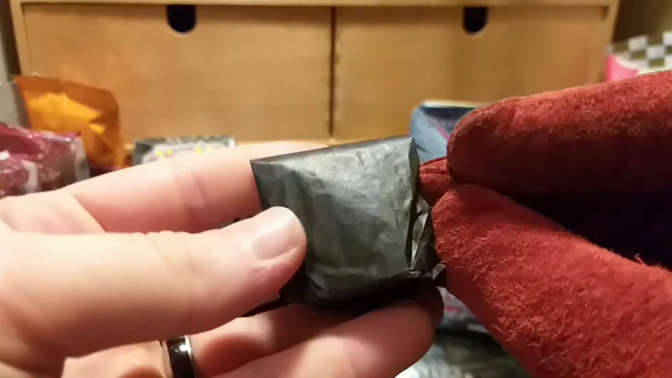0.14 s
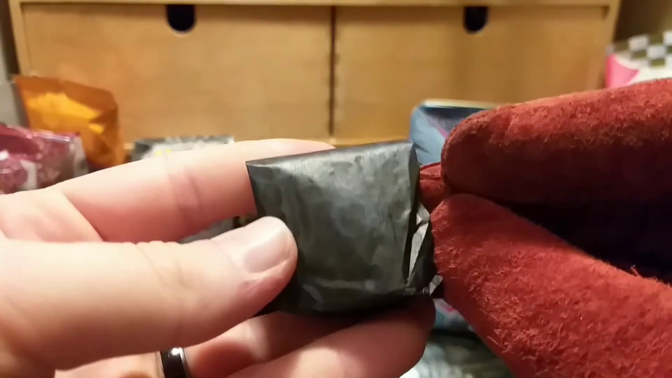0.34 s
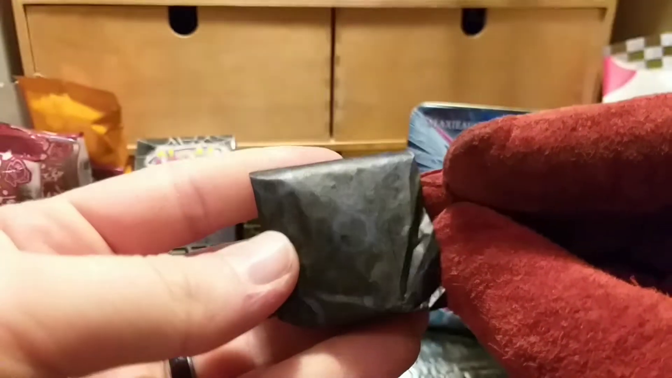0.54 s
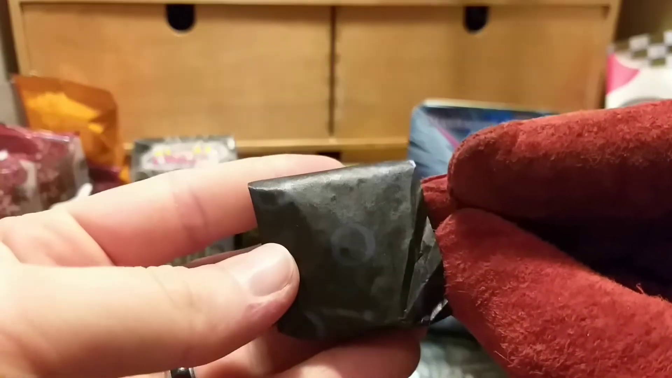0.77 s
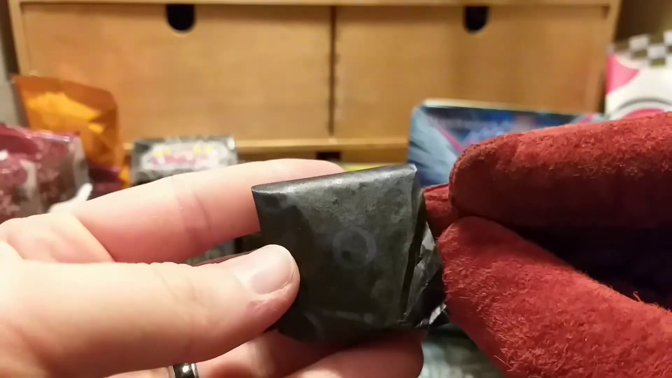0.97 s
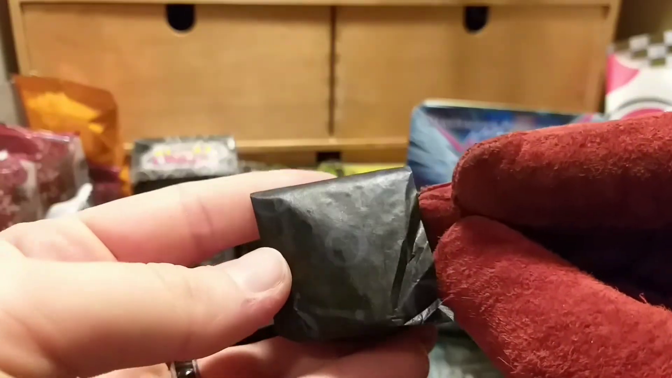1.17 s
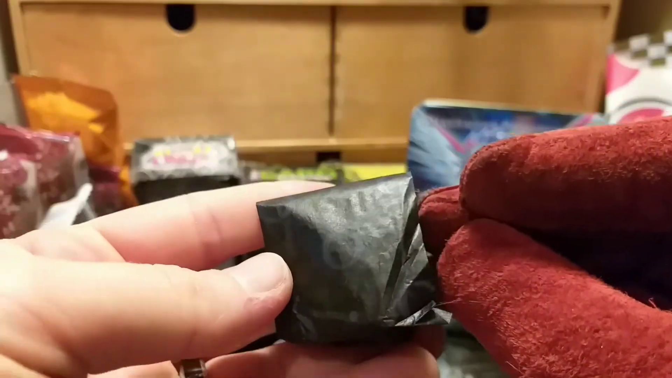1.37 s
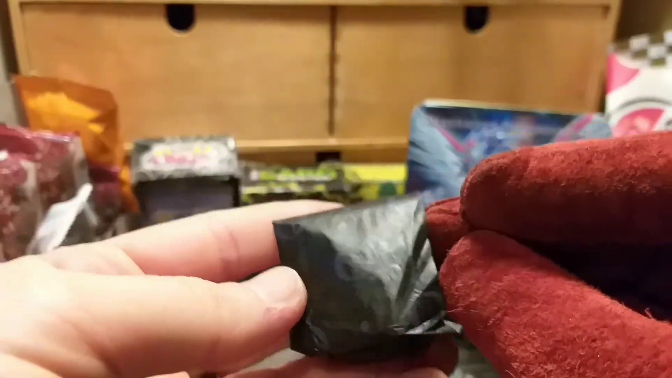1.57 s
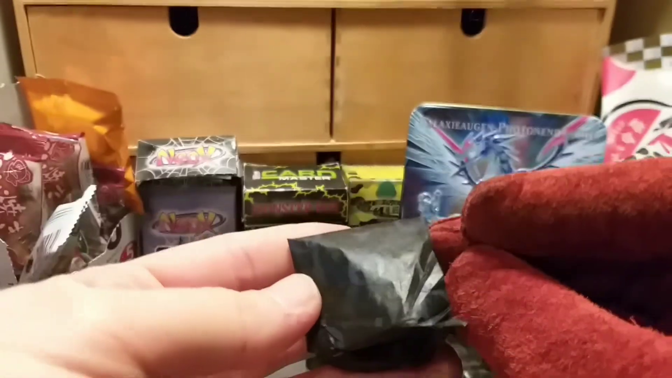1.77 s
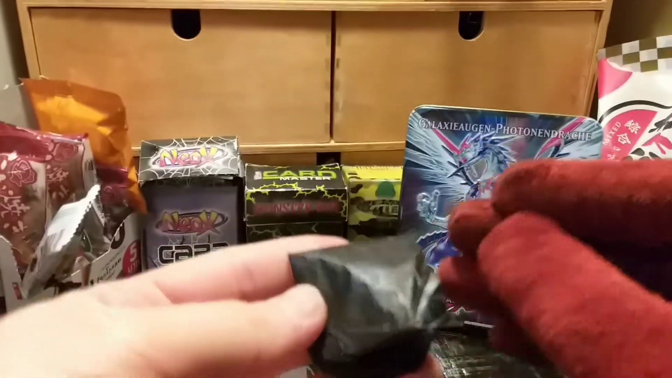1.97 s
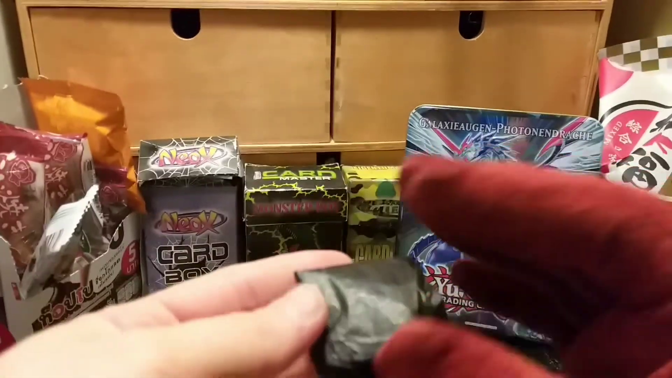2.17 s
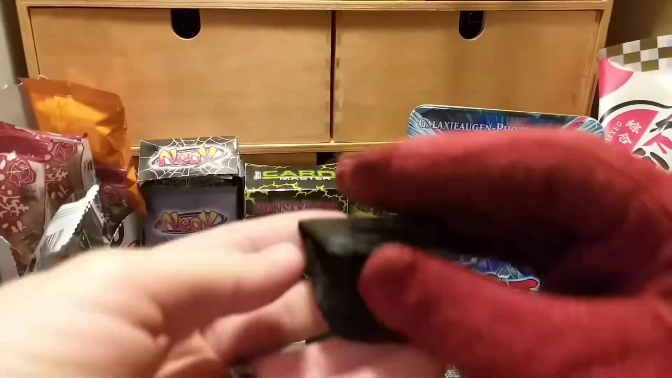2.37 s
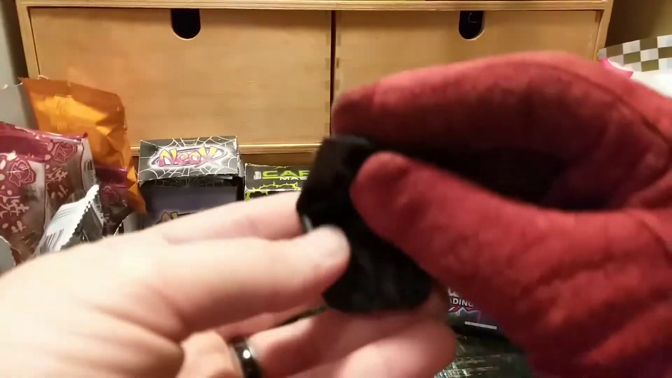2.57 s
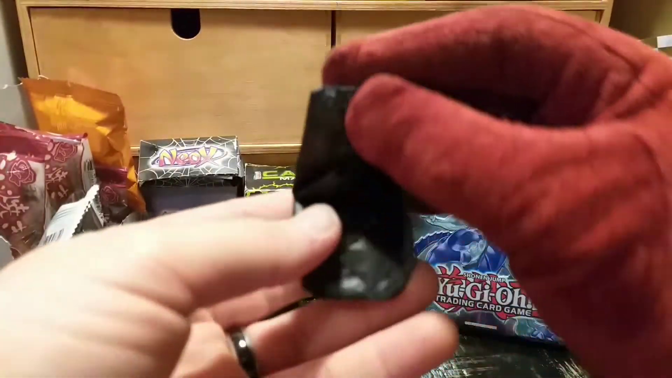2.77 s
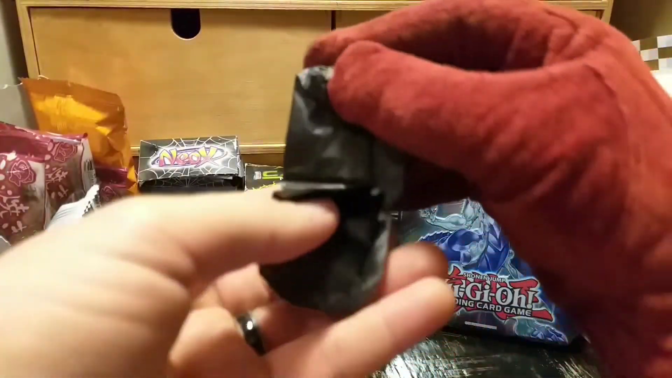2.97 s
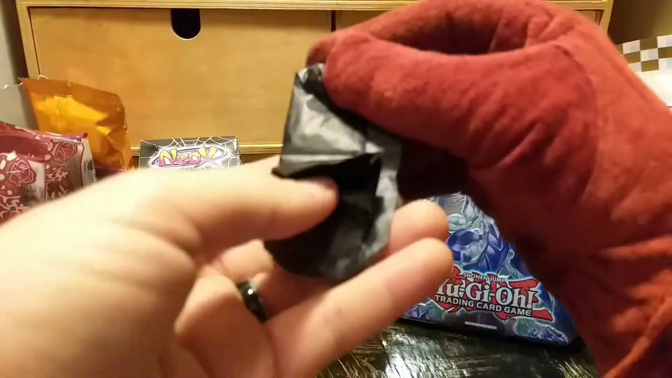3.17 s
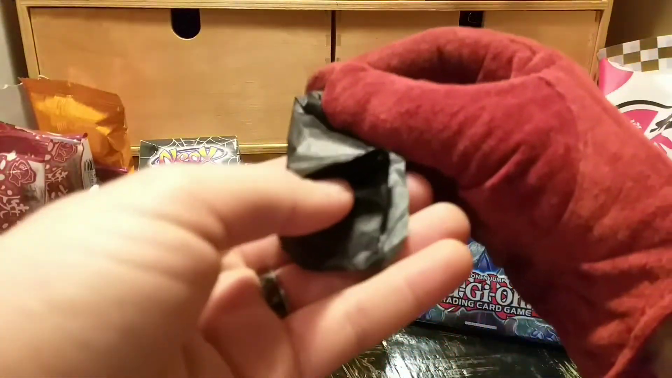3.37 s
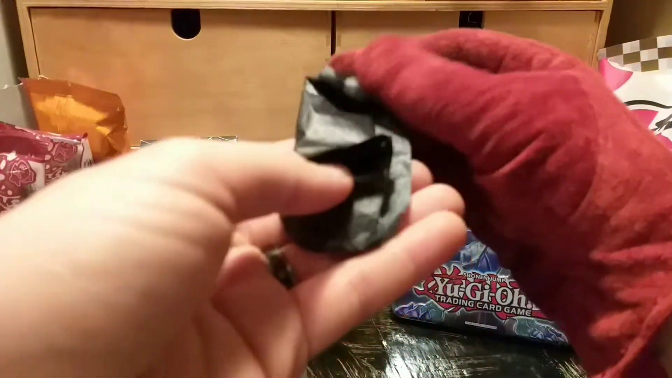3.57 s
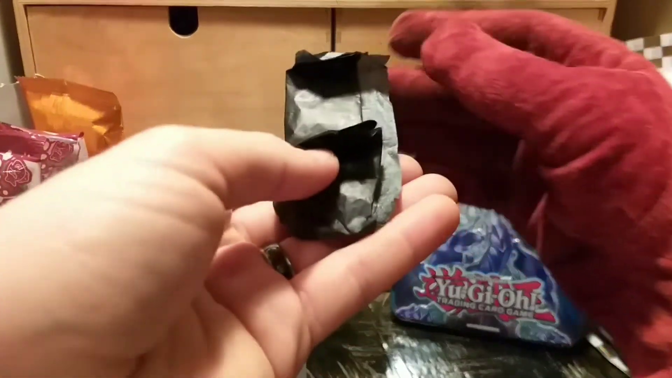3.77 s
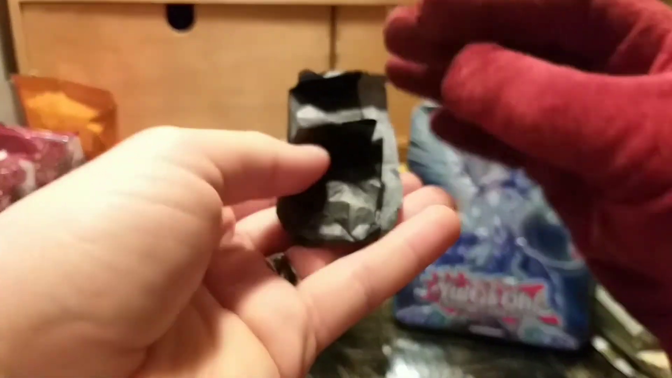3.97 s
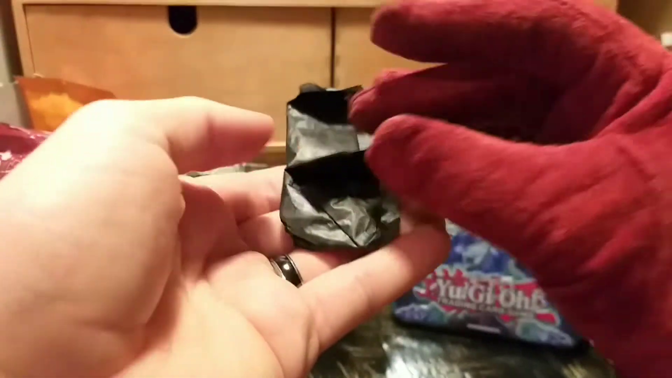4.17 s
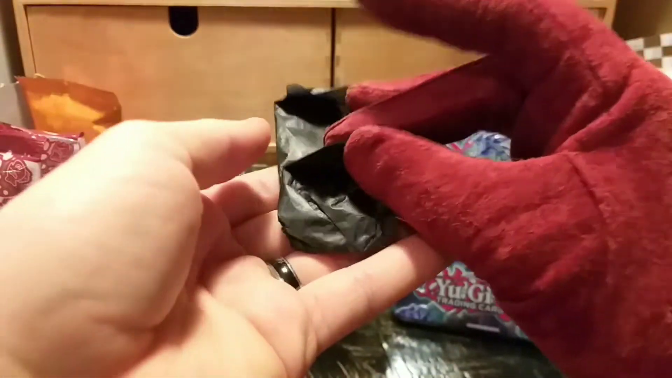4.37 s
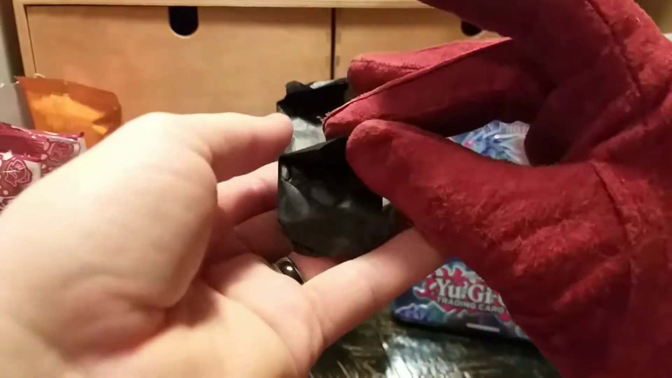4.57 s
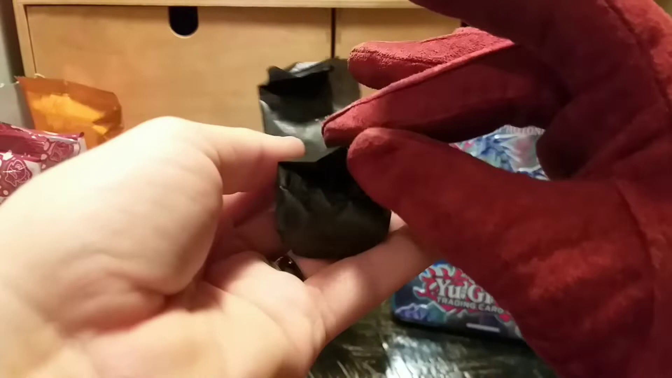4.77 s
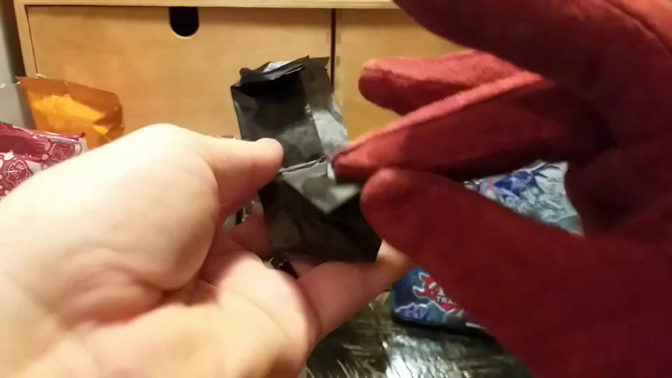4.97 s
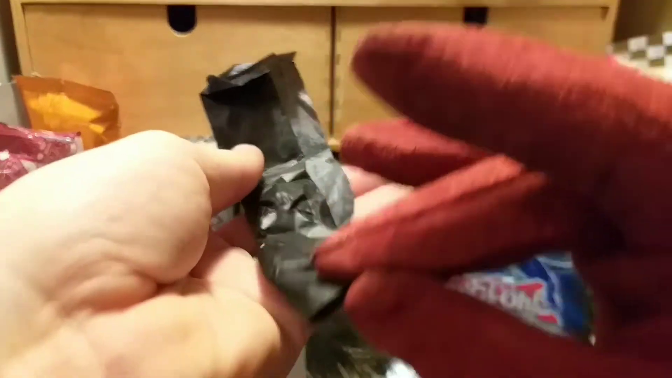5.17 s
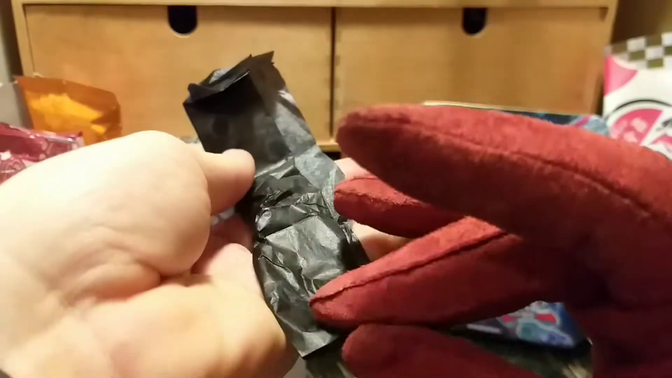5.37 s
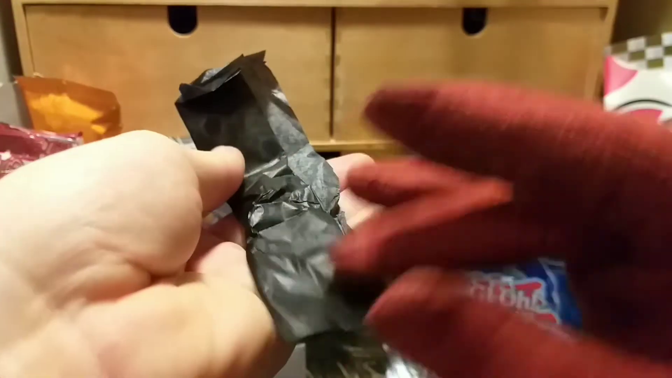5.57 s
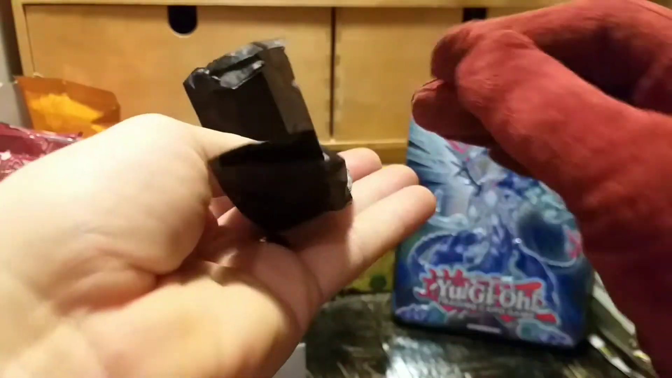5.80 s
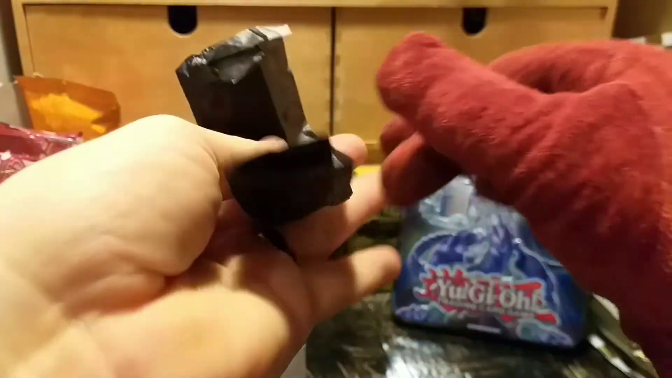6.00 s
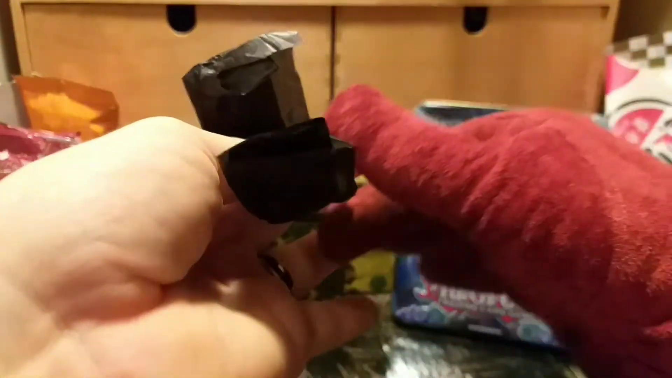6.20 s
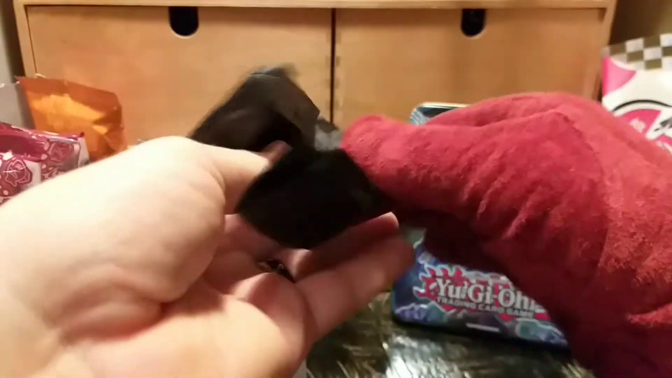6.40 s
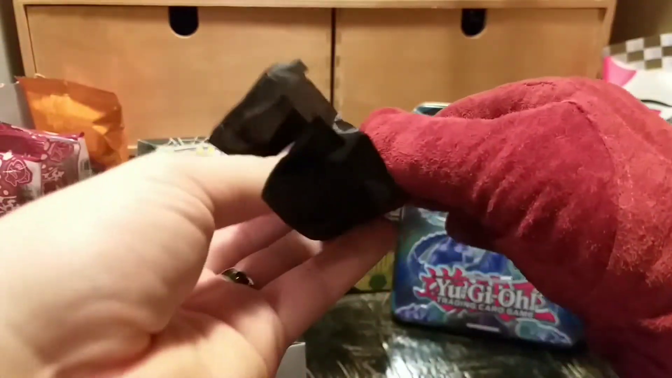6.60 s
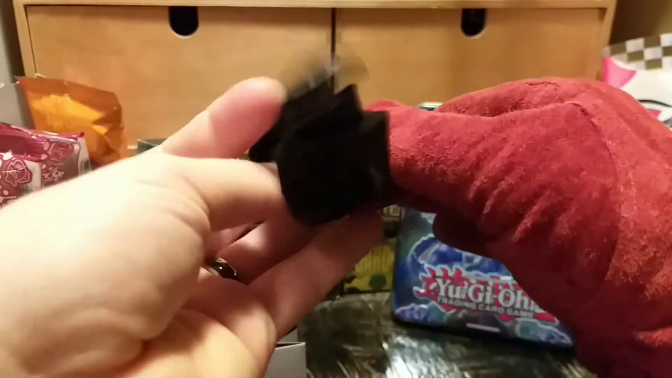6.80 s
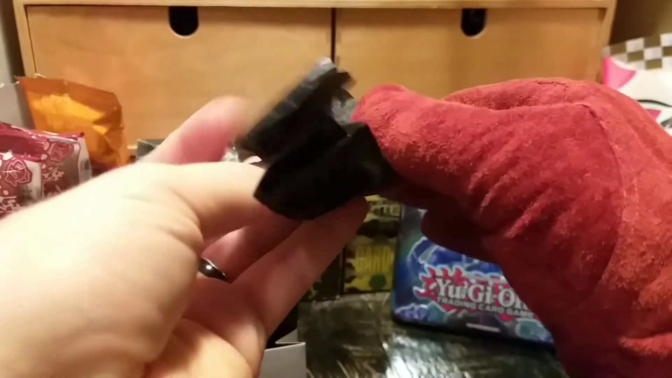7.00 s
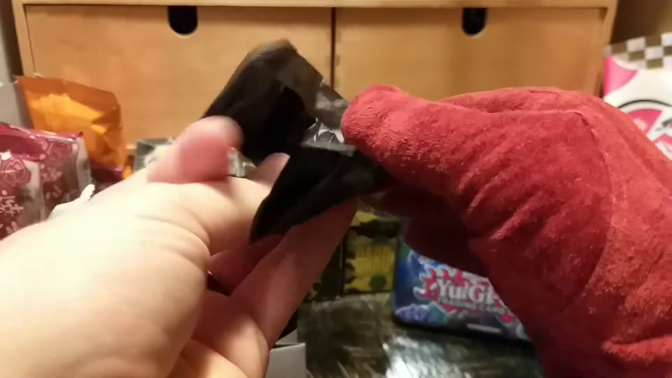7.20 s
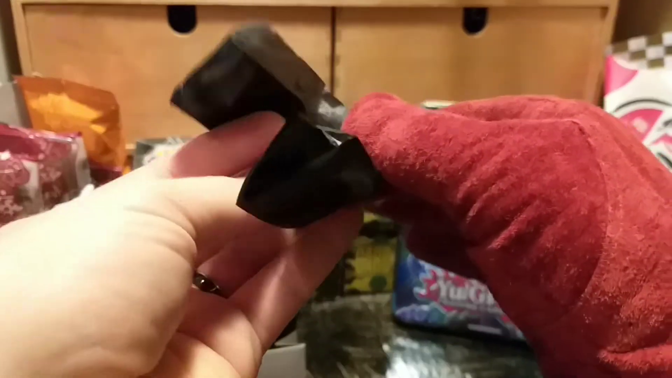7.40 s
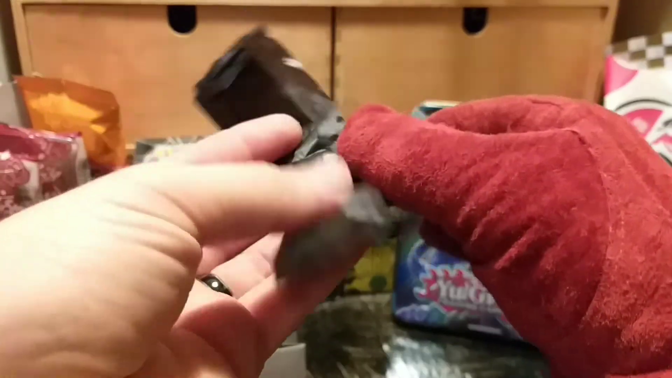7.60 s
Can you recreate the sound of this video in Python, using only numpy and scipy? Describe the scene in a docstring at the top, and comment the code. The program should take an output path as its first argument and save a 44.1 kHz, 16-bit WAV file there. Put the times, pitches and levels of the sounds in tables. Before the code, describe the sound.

Thin, crisp wrapping paper is handled close to a stereo microphone in a quiet small room with a faint low hum. From 0 to 2.2 seconds it is mostly still: tiny ticks, slight rustles, a clear snap near 1.1, and barely audible, soft wooden desk knocks. From about 2.4 the crinkling thickens, with sharp snaps around 2.7 to 2.9 and the fullest, loudest crackling bursts from 3.1 to 3.4. It thins out from 3.6 to 4.2, leaving light ticks. From 4.3 to 5.6 unwrapping is busy again: dense bright crackle, many creases and thin sliding hiss, brightest near 5.2. Around 5.7 to 6.3 only small ticks remain. Brief, strong tugs follow at 6.3, 6.8 and 7.2, the last with a hard snap, separated by quieter gaps, and small crinkles continue to the end after 7.5. Echoes are short and faint.

```python
"""Thin tissue paper, unwrapped by two hands close to a microphone: each tug is a burst of dense crackle
made of short noise grains over a smooth sliding hiss.
Single creases stand out, from faint ticks to loud snaps: resonant noise bursts, with a fading settling hiss.
A wooden desk knocks softly under the arms as a few decaying sines.
The room adds sparse, decaying echoes and a quiet noise floor, strongest at low pitch."""
import sys
import numpy as np
from scipy import signal
from scipy.fft import rfft, irfft, next_fast_len
from scipy.io import wavfile
from scipy.ndimage import uniform_filter1d

SR = 44100
rng = np.random.default_rng(int(sys.argv[2]) if len(sys.argv) > 2 else 0)


def pcm_store(signal):
    """Save signal as 16-bit PCM."""
    levels = np.round(np.clip(np.atleast_2d(signal), -1, 1) * 32767)
    wavfile.write(sys.argv[1], SR, levels.astype(np.int16).T)


N = 337365
FRAME = 2048  # samples per crease and per spectrum
HZ = np.fft.rfftfreq(FRAME, 1 / SR)
DEEP_HZ, BULK_HZ, SHEEN_HZ = 2400, 1300, 9500  # band edges of the paper's colour
CREASE_SIDE_DB = -2.5  # added to the width: creases sit nearer the middle


def gain_of(db):
    """Amplitude factor for a level in dB."""
    return 10 ** (np.asarray(db) / 20)


def evened(x):
    """Scale to unit RMS."""
    return x / np.sqrt(np.mean(x ** 2) + 1e-20)


def read(points, hz):
    """Interpolate a table's second column over log frequency."""
    f, value = np.transpose(points)
    return np.interp(np.log(hz + 1), np.log(f + 1), value)


def causal(db):
    """Minimum-phase spectra for rows of dB gains: nothing rings before the click."""
    log_gain = np.log(gain_of(np.maximum(db, -100)))
    mirrored = np.hstack([log_gain, log_gain[:, -2:0:-1]])
    return np.exp(np.conj(signal.hilbert(mirrored))[:, :len(HZ)])


def below(x, edge_hz):
    """Fourth-order low-pass."""
    return signal.sosfilt(signal.butter(4, edge_hz, fs=SR, output="sos"), x)


def above_sheen():
    """Smooth step in frequency, 0 to 1 around SHEEN_HZ."""
    return 1 / (1 + (SHEEN_HZ / (HZ + 1)) ** 8)


# paper through the microphone: (frequency [Hz], level [dB per Hz])
PAPER_COLOUR = [(290, -69.5), (500, -29.5), (772, -19.5), (1160, -14.5), (1810, -7.5), (2040, -7.5),
                (2460, -2), (3010, -3.5), (3240, -2.5), (4780, 2), (5940, -0.5), (8780, 1.5), (10200, -6),
                (13200, 0), (15900, -11.5)]
# stereo width: (frequency [Hz], side re mid [dB])
SIDE_WIDTH = [(25, -9), (60, -15), (500, -17), (1200, -18), (3000, -20), (5000, -12), (9000, -9),
              (15000, -9)]


def creases(pitch_hz, depth_db, sheen_db, t60_s, side_db):
    """A crease breaks as a burst of tiny cracks; its flat facet rings. Rows x (mid, side) x time."""
    t = np.arange(FRAME) / SR
    noise = rng.standard_normal((len(t60_s), 2, FRAME))
    cracks = noise * abs(noise) ** 0.78  # spiky: a few cracks carry the burst
    t60_s = np.clip(t60_s, .002, .05)[:, None]
    rise = (1 - np.exp(-t / (0.077 * t60_s))) ** 2  # long creases also start slowly
    burst = cracks * (rise * gain_of(-60 * t / t60_s))[:, None]

    half_width_hz = .12 * pitch_hz[:, None]
    facet_db = 8.74 / (1 + ((HZ - pitch_hz[:, None]) / half_width_hz) ** 2)
    deep = 1 / (1 + (HZ / DEEP_HZ) ** 6)
    deep_tilt = 1 + 0.13 * np.log2(DEEP_HZ / np.clip(HZ, 600, DEEP_HZ))
    colour_db = read(PAPER_COLOUR, HZ) + facet_db
    colour_db = colour_db + deep * deep_tilt * depth_db[:, None] + above_sheen() * sheen_db[:, None]
    spread = np.array([np.ones_like(HZ), gain_of(side_db + read(SIDE_WIDTH, HZ))])
    return irfft(rfft(burst) * causal(colour_db)[:, None] * spread)


# tugs of the fingers: (start [s], length [s], crackle level [dB], depth = lift below 2.4 kHz [dB],
# bulk = further lift below 1.3 kHz [dB])
FINGER_TUGS = [(0.0, 0.16, -74, 11, -3), (.33, 0.039, -67.5, 5, -3), (0.427, 0.1, -62.5, 6.5, 1),
               (0.593, 0.017, -65, 9.5, -11), (0.942, 0.047, -75.5, -7, 3), (1.316, .11, -59.5, 3.5, 10),
               (1.596, 0.16, -62, 8.5, -7), (1.777, 0.18, -64, 10.5, -2), (1.91, 0.13, -60.5, 5, 0),
               (2.158, .17, -58, 4, 2), (2.381, 0.16, -48, 3.5, 8), (2.57, 0.12, -62.5, 4, -4),
               (2.681, 0.077, -46.5, 2.5, -2), (2.792, 0.13, -44.5, -10, -7), (2.973, 0.051, -48, -1, 11),
               (3.074, 0.058, -37, 0.5, 10.5), (3.169, 0.11, -48, 11.5, 5), (3.333, 0.065, -36.5, 1, -2),
               (3.403, 0.058, -42.5, 11, 6.5), (3.499, 0.16, -46, 6.5, 3), (3.78, 0.054, -60.5, 3, 0),
               (3.958, 0.078, -60.5, 6.5, 0), (4.056, 0.013, -50, 3, 10), (4.264, .18, -44.5, 1.5, 0.5),
               (4.586, 0.14, -59, 4, 10), (4.709, .07, -44.5, -1, 2), (4.806, 0.4, -46.5, -2.5, 2),
               (5.168, 0.16, -39.5, -13, -15), (5.325, 0.17, -51.5, 0.5, -22), (5.538, 0.085, -44.5, 2, -2),
               (5.787, 0.036, -57, 1, -2), (5.92, 0.11, -60.5, 2, 1), (6.001, 0.034, -55, 6, 2),
               (6.068, 0.07, -67, 2, -5), (6.323, 0.064, -41, 1.5, 2.5), (6.474, 0.074, -54, 8, 3),
               (6.682, 0.061, -58.5, 7.5, -4), (6.787, 0.049, -37, 3, 4.5), (6.942, 0.13, -54.5, 6, 2),
               (7.169, 0.071, -42, 0.5, 2), (7.3, 0.13, -53.5, 2, 8.5), (7.44, 0.077, -67, 5, 0),
               (7.515, 0.036, -47, 6.5, -1), (7.59, .06, -42.5, 1, -1)]
STILL_DB = -96  # hands at rest
RISE_DB_PER_S, FALL_DB_PER_S = 587, 400
SWELL_DB = 3  # tug ends re its middle, as a drop


def handling():
    """Tugs set in, swell and fall; overlapping powers add and weight the colour towards the louder."""
    t = np.arange(0, N / SR + .002, .001)
    start_s, length_s, level_db, depth_db, bulk_db = np.transpose(FINGER_TUGS)[..., None]
    early_s = np.maximum(start_s - t, 0)
    late_s = np.maximum(t - start_s - length_s, 0)
    swell_db = SWELL_DB * (np.sin(np.pi * np.clip((t - start_s) / length_s, 0, 1)) - 1)
    power = gain_of(level_db + swell_db - RISE_DB_PER_S * early_s - FALL_DB_PER_S * late_s) ** 2
    total = power.sum(0) + gain_of(STILL_DB) ** 2
    curves = 10 * np.log10(total), (power * depth_db).sum(0) / total, (power * bulk_db).sum(0) / total
    return (np.interp(np.arange(N) / SR, t, curve) for curve in curves)


def slide():
    """Fingers glide over the sheet: smooth noise in the paper's colour, with duller treble."""
    colour_db = read(PAPER_COLOUR, HZ) - 7 * above_sheen()
    spectra = causal(np.array([colour_db, colour_db + read(SIDE_WIDTH, HZ)]))
    taps = irfft(spectra)[:, :512]
    hiss = signal.oaconvolve(rng.standard_normal((2, N)), taps, axes=1)[:, :N]
    return hiss / hiss[0].std()


def crackle(max_per_s=600., spread_db=3.5, clump_db=2.5, count=20):
    """Many small creases break in clumps over the sliding hiss; the bend of the sheet colours both."""
    level_db, depth_db, bulk_db = handling()
    busy = np.clip(gain_of(.4 * (level_db + 42.5)), .25, 1)  # light handling breaks fewer creases

    draw = rng.random((count, 4))
    pitch_hz = 2600 * 3.46 ** draw[:, 0]
    kind_depth_db, sheen_db = 14 * draw[:, 1] - 8.5, 9 * draw[:, 2] - 3
    t60_s = 0.0056 + 0.016 * draw[:, 3]
    kinds = creases(pitch_hz, kind_depth_db, sheen_db, t60_s, CREASE_SIDE_DB)
    kinds /= np.linalg.norm(kinds[:, 0], axis=1)[:, None, None]

    smooth = uniform_filter1d(rng.standard_normal(N), size=300)
    clumps = evened(uniform_filter1d(smooth, size=300))
    size_db = spread_db * np.minimum(rng.exponential(1, N), 3.2) + clump_db * clumps
    breaks = rng.random(N) < busy * max_per_s / SR
    size = gain_of(size_db) * breaks
    size *= gain_of(level_db) / np.sqrt(busy * np.mean(size ** 2 / busy))  # fewer creases, same power

    kind = rng.integers(0, count, N)
    grains = sum(signal.oaconvolve((size * (kind == k))[None], kinds[k, :, :900], axes=1)[:, :N]
                 for k in range(count))
    grains += slide() * gain_of(level_db - 6.0 - 4.2 * busy)  # slide shows most in light handling

    # a loose bend is deeper than a tight pinch; crushing the whole parcel adds bulk
    low = below(grains, DEEP_HZ)
    body = low + below(low, BULK_HZ) * (gain_of(bulk_db) - 1)
    return grains - low + body * gain_of(depth_db)


# air between hands, parcel and desk: (frequency [Hz], width [Hz], lift [dB])
AIR_POCKET = [(830, 170, 2.5), (1165, 190, -3), (1487, 50, 6), (1840, 92, 2), (2040, 59, -2),
              (2330, 270, 4.5), (3030, 110, -4.5), (3164, 55, 4)]


def pocket(x):
    """Cupped hands and desk top lend peaks and dips to every crease."""
    db = sum(lift_db / (1 + (2 * (HZ - hz) / width_hz) ** 2) for hz, width_hz, lift_db in AIR_POCKET)
    return signal.oaconvolve(x, irfft(causal(db[None])), axes=1)[:, :N]


# reverberation: (frequency [Hz], t60 [s])
ROOM_DECAY = [(1000, 0.19), (4000, 0.11), (12000, 0.12)]


def room(x, start_s=0.0039, wall_s=0.0056, near_db=-2.0, count=3, turn_hz=7):
    """Sparse echoes, weaker before the first wall, decay per band; path sets take turns at turn_hz."""
    taps = np.zeros((count, 2, SR // 4))
    at = np.arange(round(start_s * SR), SR // 4 - 20, 20)
    at = at + rng.integers(0, 20, (count, 2, len(at)))
    np.put_along_axis(taps, at, rng.choice([-1., 1.], at.shape), 2)
    taps[..., :round(wall_s * SR)] *= gain_of(near_db)

    hz, t, z = signal.stft(taps, SR, nperseg=128)
    decay = gain_of(-60 * t / read(ROOM_DECAY, hz)[:, None])
    tails = signal.istft(z * decay, SR, nperseg=128)[1]
    tails *= gain_of([[0], [-8.]]) / np.linalg.norm(tails[0, 0])  # mid, side

    phase = np.arange(N) / SR * 2 * np.pi * turn_hz + np.arange(count)[:, None] * np.pi / count
    shares = np.cos(phase) * np.sqrt(2 / count)
    return signal.oaconvolve((x * shares)[:, None], tails, axes=2).sum(0)[:, :N]


# room tone: (frequency [Hz], level [dB per Hz])
TONE_COLOUR = [(24, -24), (40, -10), (140, -4), (275, -15), (312, -11.5), (401, -12.5), (515, -17),
               (713, -20.5), (893, -19.5), (1270, -21.5), (1440, -24), (2040, -22.5), (14700, -26),
               (15900, -43)]
TONE_DB = -75  # RMS of mid


def room_tone():
    """Low hum of the house over microphone hiss: steady noise shaped in frequency."""
    frames = N // 512 + 5
    real, imag = rng.standard_normal((frames, len(HZ), 2, 2)).T
    z = (real + 1j * imag) * gain_of(read(TONE_COLOUR, HZ))[:, None]
    z[1] *= gain_of(read(SIDE_WIDTH, HZ) - 1.5)[:, None]
    tone = signal.istft(z, nperseg=FRAME, noverlap=1536)[1][:, :N]
    return gain_of(TONE_DB) * tone / tone[0].std()


# creases that stand out singly, from faint ticks to loud snaps, before the pocket:
# (time [s], peak level [dB], facet pitch [Hz], depth = lift below 2.4 kHz [dB])
SINGLE_SNAPS = [(0.2567, -25, 4100, -9), (0.27, -38, 4950, -1), (0.3637, -49, 8180, -6),
                (0.43, -36.5, 5140, -9), (0.4819, -46, 7060, -18), (0.5717, -35.5, 7500, -27),
                (0.594, -33, 5200, -40), (0.604, -25, 8040, -43), (0.644, -47.5, 5500, -18),
                (1.068, -38, 9100, -19), (1.0829, -18, 4660, -28), (1.415, -39, 6600, -21),
                (1.58, -46, 4070, 1), (1.6722, -40.5, 7500, 3), (1.7238, -37, 4390, -10),
                (1.823, -32, 7540, -34), (1.8352, -38.5, 4940, -10), (1.9378, -32.5, 6460, -36),
                (2.0098, -27.5, 4970, -54), (2.027, -29, 4130, -43), (2.102, -40.5, 7110, -19),
                (2.1234, -25.5, 4940, -55), (2.2268, -29, 4740, -22), (2.25, -26.7, 9150, -14),
                (2.3774, -31, 8400, -1), (2.4128, -35.5, 7200, -6), (2.472, -29.5, 8150, 0),
                (2.507, -23, 9050, -3), (2.5159, -23, 4800, -4), (2.541, -23.5, 7850, -1),
                (2.5942, -40, 4000, -13), (2.677, -26.5, 6750, -35), (2.6992, -19.5, 7500, -33),
                (2.728, -24.5, 7140, -2), (2.7708, -28, 4370, 1), (2.8255, -25, 8950, 1),
                (2.8468, -21.5, 3200, -3), (2.8813, -17.5, 3400, 1), (2.8917, -17, 6900, -3.5),
                (2.924, -27.5, 5400, -7), (2.969, -23.5, 4500, -0.5), (3.11, -17, 4620, 6.5),
                (3.139, -20.5, 8300, -1), (3.2585, -30, 5170, 9), (3.3109, -26.5, 7600, 4),
                (3.4368, -34, 4260, 16), (3.4498, -25.5, 5900, 12), (3.52, -26, 5500, -31),
                (3.572, -29, 5740, -6), (3.645, -23.5, 10200, -41), (3.7207, -37, 8360, 2),
                (3.762, -38.5, 7400, -16), (3.789, -36, 6330, -28), (3.8163, -30.5, 8450, -6),
                (3.8233, -35.5, 5630, -30), (3.9358, -40.5, 8310, -1), (4.006, -38, 6760, -26),
                (4.1258, -32.5, 9500, -6), (4.2304, -38.5, 8500, -5), (4.326, -24, 7000, 2),
                (4.401, -33, 4910, 9.5), (4.415, -19.5, 9800, 2), (4.427, -25, 4930, -2),
                (4.4687, -28.5, 5060, -8), (4.514, -30.5, 8550, -19), (4.6258, -36.5, 5300, -3),
                (4.6942, -29.5, 5100, -20), (4.7227, -25.5, 4800, -5), (4.7557, -23, 3600, -1.5),
                (4.7789, -21.5, 5450, -0.5), (4.846, -18.5, 7160, -3.5), (4.8949, -23, 6400, -3),
                (4.9183, -20.5, 8400, -9), (4.9494, -21.5, 9100, -10), (4.9562, -18, 4850, -15),
                (4.9655, -27, 4650, -5), (5.0109, -22, 7300, -0.5), (5.0482, -20.5, 7900, -17),
                (5.1289, -20, 8000, -4), (5.201, -31, 5100, 10), (5.279, -27.5, 7410, 9),
                (5.307, -24, 4470, 0.5), (5.3904, -29.5, 4350, -13), (5.404, -24, 4600, -17),
                (5.4177, -25, 4180, -10), (5.431, -28.5, 4680, -15), (5.484, -31, 4430, 1),
                (5.5248, -24.5, 5960, -2), (5.5466, -24, 9100, -16), (5.6147, -25.5, 4280, -19),
                (5.639, -28, 5750, -7), (5.6609, -32.5, 6900, 2), (5.685, -40.5, 6160, -18),
                (5.699, -46, 4480, -16), (5.7698, -28, 3800, 2.5), (5.795, -41, 4470, -5),
                (5.8174, -46, 4950, -22), (5.8475, -40.5, 8900, -11), (5.8761, -25, 4830, -5),
                (5.9424, -37.5, 8250, -2), (5.9598, -38.5, 5500, -11), (6.0001, -31, 6200, -26),
                (6.012, -27, 6200, -22), (6.098, -40, 7050, -18), (6.121, -46, 4160, -24),
                (6.4039, -29, 4630, 1), (6.5142, -34.5, 8100, -6), (6.6308, -45.5, 9000, 12),
                (6.798, -29, 6940, -3), (6.8278, -19, 3940, 0.5), (6.8916, -31.5, 5640, 4),
                (7.0631, -30.5, 7500, -20), (7.0989, -34, 4900, 8.5), (7.126, -28.5, 7800, -31),
                (7.147, -36, 8570, -29), (7.161, -29.5, 5900, -3), (7.174, -16.5, 9000, -4),
                (7.1894, -23.5, 5800, 6.5), (7.2256, -30.5, 4020, 23.5), (7.2519, -29.5, 4400, 7.5),
                (7.3366, -28.5, 8800, 1.5), (7.3987, -32.5, 5900, -20), (7.5193, -29, 6200, 2.5),
                (7.5486, -35, 8500, -14), (7.592, -25, 5060, -17)]
SNAP_T60_S, SNAP_HZ, SMALL_IS_SHORT = .012, 5500, 0.33  # t60 at SNAP_HZ; exponent: high facets stop sooner
SETTLE_DB, SETTLE_DB_PER_S = -38.5, 238  # hiss start re snap peak, fade
SETTLE_DEPTH = 0.13  # share of the snap's depth


def snaps():
    """Single creases, from faint ticks to loud snaps; the sheet settles after each with a fading hiss."""
    time_s, peak_db, pitch_hz, depth_db = np.transpose(SINGLE_SNAPS)
    sheen_db = -2.5 + 5.1 * rng.standard_normal(len(time_s))
    t60_s = SNAP_T60_S * (SNAP_HZ / pitch_hz) ** SMALL_IS_SHORT
    sounds = creases(pitch_hz, depth_db, sheen_db, t60_s, CREASE_SIDE_DB)
    sounds *= (gain_of(peak_db) / abs(sounds[:, 0]).max(1))[:, None, None]
    out = np.zeros((2, N + FRAME))
    at = np.round(time_s * SR).astype(int)
    for start, sound in zip(at, sounds):
        out[:, start:start + FRAME] += sound

    power = [np.bincount(at, gain_of(peak_db + SETTLE_DB + lift_db) ** 2, N)
             for lift_db in (0, SETTLE_DEPTH * depth_db)]
    fade = gain_of(-SETTLE_DB_PER_S / SR) ** 2
    top, bottom = np.sqrt(signal.lfilter([1], [1, -fade], power))
    hiss = slide()
    low = below(hiss, DEEP_HZ)
    return out[:, :N] + (hiss - low) * top + low * bottom


# blows of the arms: (time [s], drive level [dB], lift of lowest mode [dB])
ARM_KNOCKS = [(0.412, -92, -2), (0.46, -79.5, -13), (0.967, -84.5, -2), (1.018, -93, -18),
              (1.32, -69.5, -14), (1.672, -73, -8.5), (1.764, -91, 3), (1.832, -78.5, -12),
              (3.11, -68, -29), (7.191, -70, -17)]
# modes of the wood: (frequency [Hz], level re drive [dB], t60 [s])
DESK_MODES = [(118.1, 14.5, 0.55), (307, 2.5, 0.19), (404.6, 8, 0.22), (456, 5.5, 0.19)]


def desk():
    """Soft blows of the arms ring the low modes of the wood as decaying sines."""
    t = np.arange(SR // 2) / SR
    out = np.zeros(N + SR)
    for time_s, drive_db, low_db in ARM_KNOCKS:
        lifts_db = [low_db] + [0] * (len(DESK_MODES) - 1)
        ring = sum(gain_of(db + lift_db - 60 * t / t60_s) * np.sin(2 * np.pi * (hz * t + rng.random()))
                   for (hz, db, t60_s), lift_db in zip(DESK_MODES, lifts_db))
        soft_onset = 1 - np.exp(-t / 0.005)
        out[round(time_s * SR):][:len(t)] += gain_of(drive_db) * ring * soft_onset
    return np.array([out[:N], 0.042 * out[:N]])  # mid, side


def scene():
    """Sum mid and side of all sources, then turn them into left and right."""
    paper = pocket(snaps() + crackle())
    echoes = gain_of(-15) * room(paper[0])
    mid, side = paper + echoes + desk() + room_tone()
    return np.array([mid + side, mid - side])


# microphone ports: (frequency [Hz], left re right [dB])
PORT_LEAN = [(900, -1), (1500, 2), (2300, 0.2), (9000, -0.3)]
EDGE_HZ = 15950


def record(dry):
    """Two microphone ports differ a little, most around 1.5 kHz; a low-pass then limits the band."""
    size = next_fast_len(N)
    half_lean_db = read(PORT_LEAN, np.fft.rfftfreq(size, 1 / SR)) / 2
    ports = irfft(rfft(dry, size) * gain_of([half_lean_db, -half_lean_db]), size)[:, :N]
    band_limit = signal.firwin(511, EDGE_HZ, window=("kaiser", 9), fs=SR)
    return signal.oaconvolve(ports, band_limit[None], "same")


dry = scene()
out = record(dry)
pcm_store(out)
```